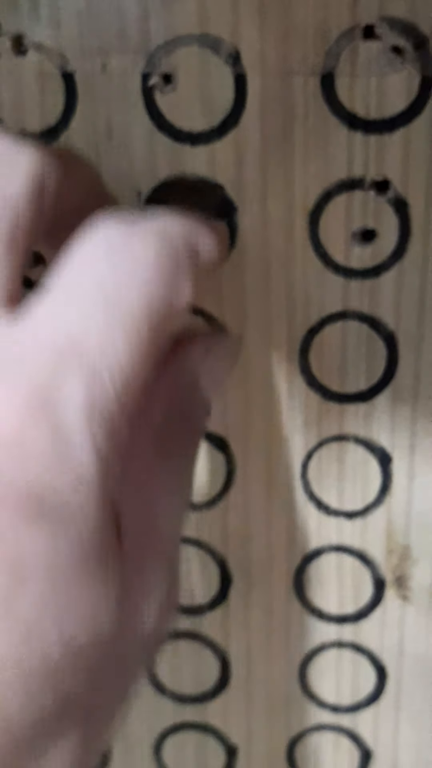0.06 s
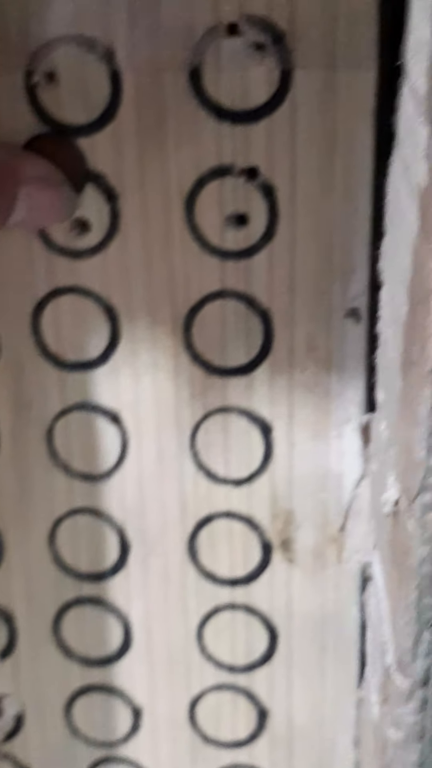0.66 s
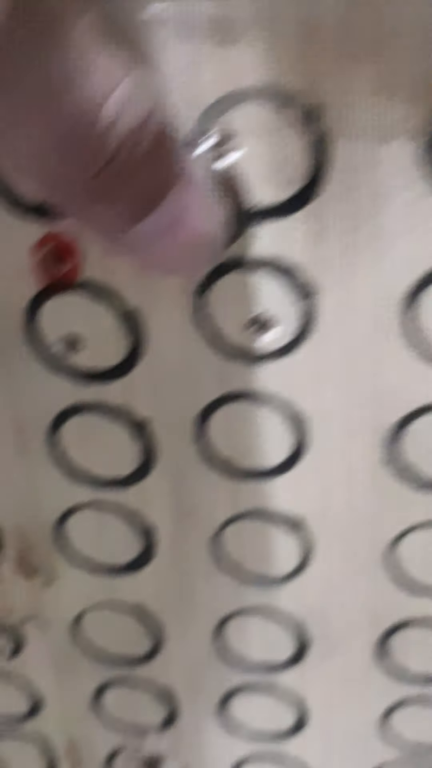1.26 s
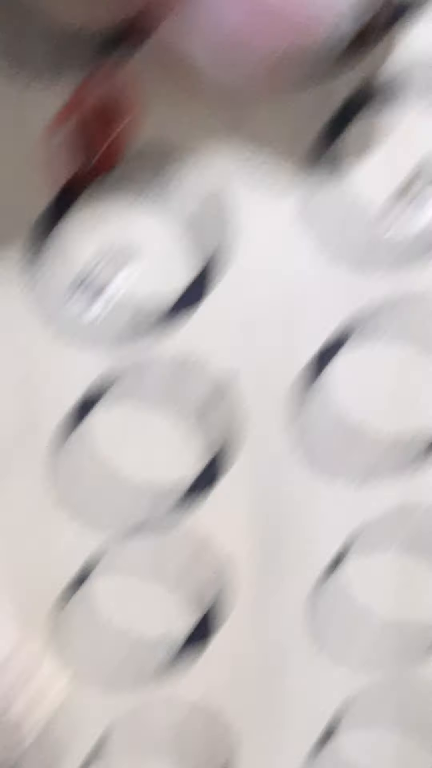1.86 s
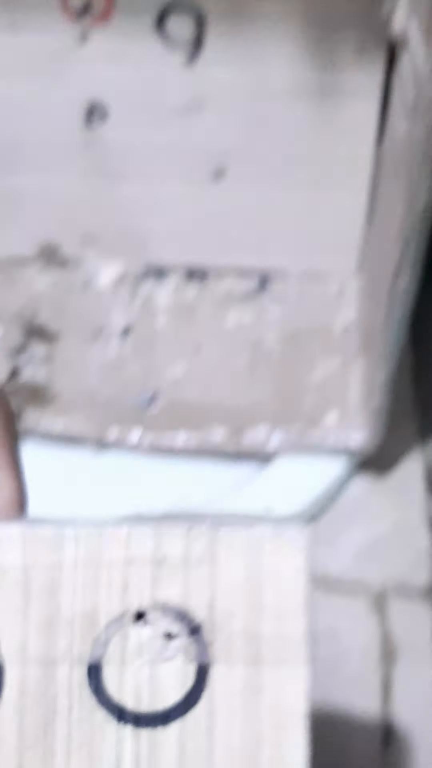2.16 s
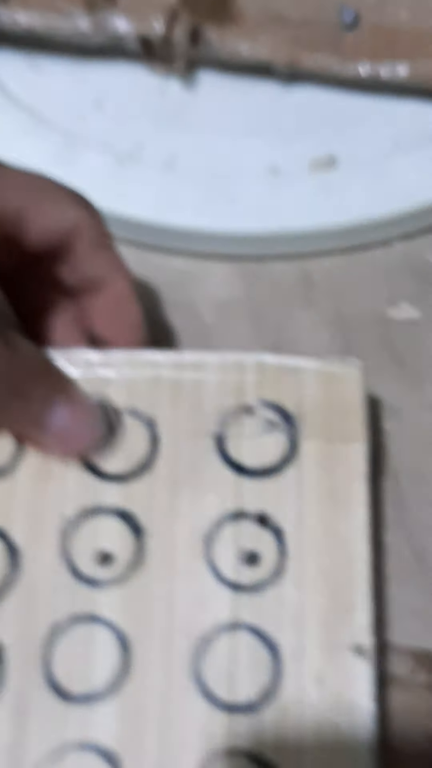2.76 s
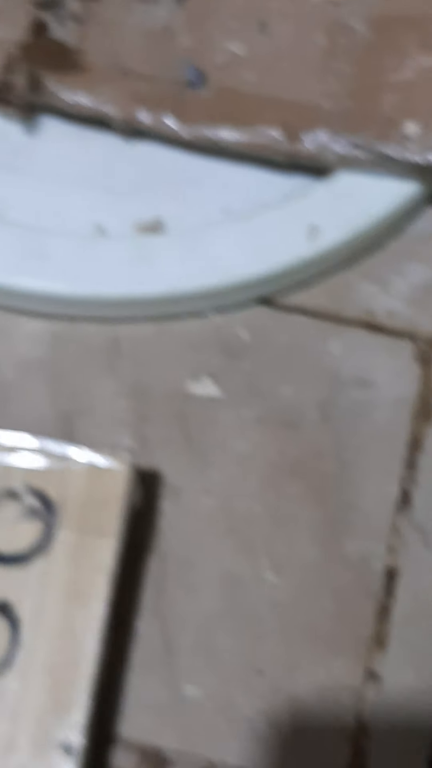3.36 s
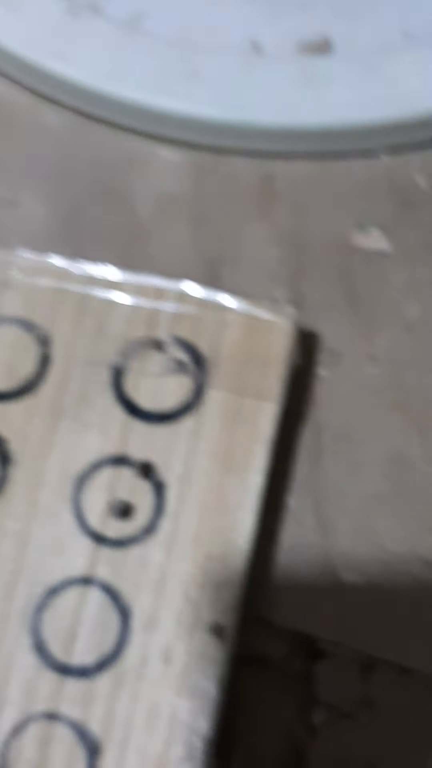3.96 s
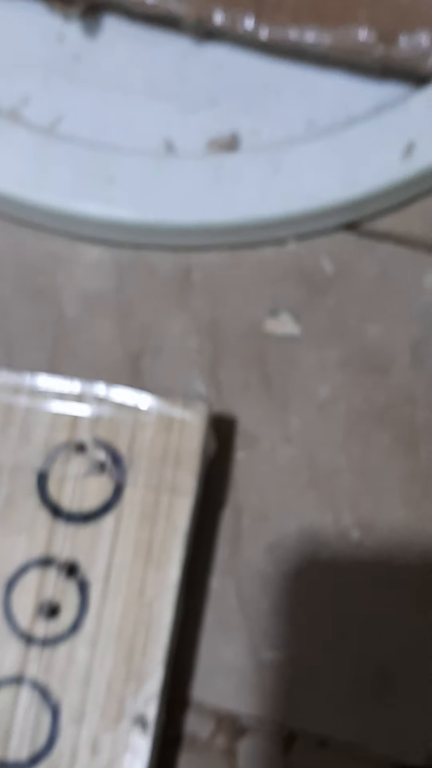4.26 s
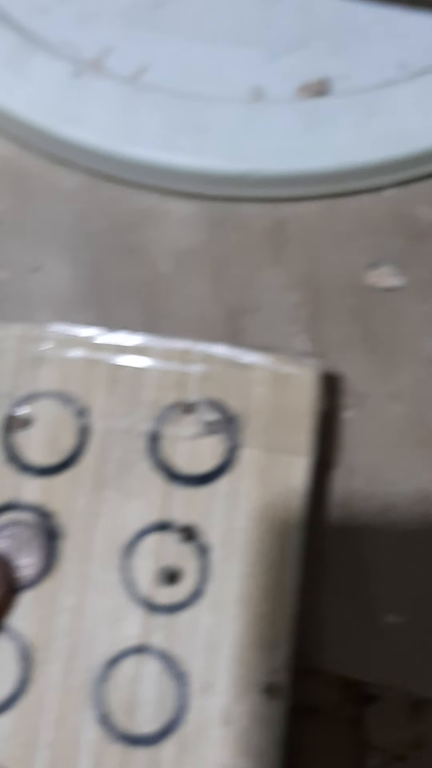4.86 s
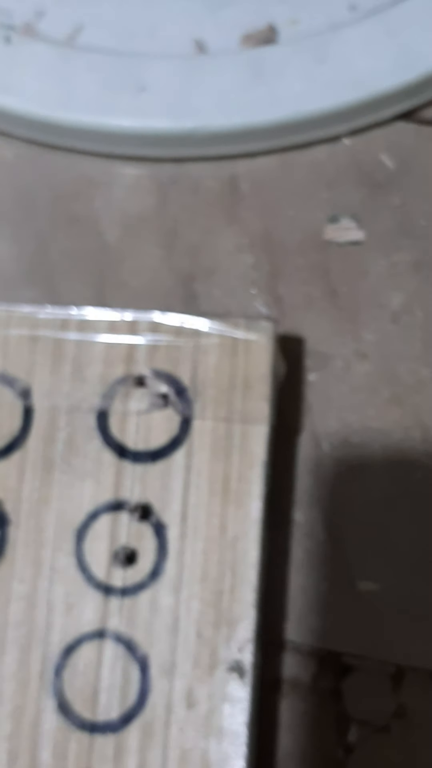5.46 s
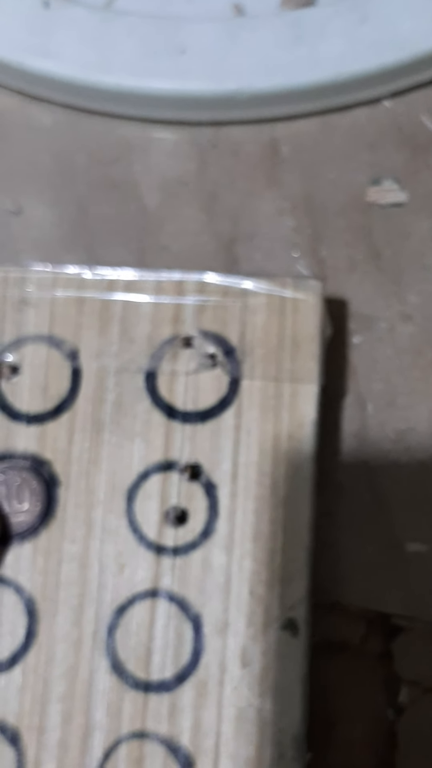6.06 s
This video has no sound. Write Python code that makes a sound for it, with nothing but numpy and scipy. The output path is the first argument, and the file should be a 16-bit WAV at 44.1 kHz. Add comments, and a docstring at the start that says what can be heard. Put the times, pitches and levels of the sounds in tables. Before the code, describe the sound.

A disc slides and taps on a wooden board, which clatters onto a hard floor, then a coin clicks on it over faint hum.

```python
"""A room with a hard floor, the microphone close to a wooden game board, a fan humming behind.
A disc slides over the board, hissing, catching and tapping on the grain. The board knocks, chatters
down onto the floor and rings in its modes; then a coin clicks on it. The holding hand covers the right
port, which hears mostly its rumble. The loud clatter ducks the gain control for about a second."""
import sys
import numpy as np
from scipy import signal
from scipy.fft import rfft, irfft, next_fast_len
from scipy.io import wavfile
from scipy.ndimage import uniform_filter1d, minimum_filter1d

SR = 44100
rng = np.random.default_rng(int(sys.argv[2]) if len(sys.argv) > 2 else 0)


def inscribe(sig):
    """Save sig as 16-bit PCM at rate SR to the path in sys.argv[1].

    A 1-D sig is mono; a 2-D sig holds one channel per row.
    Samples are clipped to [-1, 1] before scaling.
    """
    pcm = np.round(np.clip(np.atleast_2d(sig).T, -1, 1) * 32767)
    wavfile.write(sys.argv[1], SR, pcm.astype(np.int16))


N = 269098

# hiss of light sliding on wood: (frequency [Hz], relative level [dB])
FRICTION_SPECTRUM = [(1500, -1), (3500, -10), (6500, 3.5), (8200, -10), (11500, -4), (16000, -9)]
# crack of a blow on the held board: (frequency [Hz], relative level [dB])
WOOD_CRACK_SPECTRUM = [(150, -8.5), (700, -10), (1200, 6), (1500, -10), (3700, -5), (4700, -16.5),
                       (6300, -12), (8200, -31.5), (16000, -43.5)]


def from_db(db):
    """Decibels to gain."""
    return 10 ** (np.asarray(db) / 20)


def rms_one(x):
    """Scale to unit power."""
    return x / np.sqrt(np.mean(x ** 2) + 1e-20)


def colour(x, spectrum):
    """Shape a noise by a table of (frequency [Hz], level [dB]), rolling off beyond its ends."""
    hz, db = np.transpose(spectrum)
    size = next_fast_len(len(x))
    bins = np.maximum(np.arange(size // 2 + 1) * SR / size, 1)
    rolloff = np.minimum(bins / hz[0], 1) ** 2 * np.minimum(hz[-1] / bins, 1) ** 2
    gain = from_db(np.interp(np.log(bins), np.log(hz), db))
    return irfft(rfft(x, size) * rolloff * gain, size)[:len(x)]


def noise(spectrum):
    """Smooth coloured noise, rms 1."""
    return rms_one(colour(rng.standard_normal(N), spectrum))


def grains(spectrum, per_s, spread_db):
    """Random micro-slips of uneven size, rms 1."""
    sizes = from_db(spread_db * np.minimum(rng.exponential(1, N), 4)) * rng.choice([-1, 1], N)
    slips = sizes * (rng.random(N) < per_s / SR)
    return rms_one(colour(slips, spectrum))


def clicks(times, db):
    """One impulse of the given level at each time."""
    out = np.zeros(N)
    out[np.round(times * SR).astype(int)] = from_db(db)
    return out


def ring(force, hz, t60):
    """A damped mode: a unit impulse sets a sine of height 1 ringing."""
    r, w = from_db(-60 / (t60 * SR)), 2 * np.pi * hz / SR
    return signal.lfilter([0, np.sin(w)], [1, -2 * r * np.cos(w), r * r], force + 1e-18)


def fade(power, t60):
    """Amplitude envelope of energy that dies away after each input."""
    decay = np.exp(-np.log(10 ** 6) / (t60 * SR))
    return np.sqrt(signal.lfilter([1], [1, -decay], power + 1e-18))


def struck(hits, modes, crack, crack_db, crack_t60, tail_db, tail_t60, contact_s=.00013):
    """Each contact rings the main modes, plus a crack and a short wash of dense, weak modes."""
    times, hit_db, hardness = np.transpose(hits)
    body = 0
    for hz, db, t60 in modes:
        # a hard contact favours the high modes; each spot struck has a mix of its own
        mode_db = hit_db + db + hardness * np.log2(hz / 1000) + rng.standard_normal(len(times))
        mode = ring(clicks(times, mode_db), hz, t60)
        body += signal.lfilter(*signal.iirpeak(hz, 1, fs=SR), mode)  # builds up in about one cycle
    # little is radiated below the lowest mode
    body = signal.sosfilt(signal.butter(2, .7 * modes[0][0], "high", fs=SR, output="sos"), body)
    body = signal.sosfilt(signal.butter(8, 7400, fs=SR, output="sos"), body)
    power = clicks(times, hit_db + hardness) ** 2
    wash = from_db(crack_db) * fade(power, crack_t60) + from_db(tail_db) * fade(power, tail_t60)
    smoothing = np.exp(-1 / (contact_s * SR))
    return body + noise(crack) * signal.lfilter([1 - smoothing], [1, -smoothing], wash)


def fan(waver=.06, air_db=-51):
    """The room tone: a fan's motor hum wavers slightly over its rushing air."""
    # motor hum: (frequency [Hz], rms level [dB])
    hum_lines = [(120, -42.5), (284, -67), (354.5, -65), (641, -74), (707, -76.5)]
    # rush of air: (frequency [Hz], relative level [dB])
    air_spectrum = [(30, -7.5), (65, 13), (100, 13), (160, 0), (280, 3), (460, -1), (750, 3), (1300, 1.5),
                    (2400, -1), (3800, -1), (6800, -6.5), (8100, -22), (16000, -27.5)]
    t = np.arange(N) / SR
    hum = sum(np.sqrt(2) * from_db(db) * np.sin(2 * np.pi * (hz * t + rng.random()))
              for hz, db in hum_lines)
    drift = noise([(1, 0), (4, -6)])
    return hum * (1 + waver * drift) + from_db(air_db) * noise(air_spectrum)


def hand(grip_db=-45.5, relax_db_per_s=1.4, squeeze_db=9, squeeze_at_s=4.987, squeeze_width_s=.17):
    """Handling noise: skin creeps on the case, relaxing, then squeezing once; shifting fingers bump."""
    # rumble through the case: (frequency [Hz], relative level [dB])
    rumble_spectrum = [(22, -9), (45, 9.5), (70, 10.5), (120, 3.5), (200, -5), (350, -25.5), (700, -48.5),
                       (1500, -61.5)]
    # soft finger bumps: (time [s], relative level [dB])
    finger_bumps = [(0.673, -22), (1.658, -27.5), (2.833, -19.5), (3.383, -25), (3.5436, -5),
                    (5.005, -24.5)]
    t = np.arange(N) / SR
    squeeze = np.exp(-((t - squeeze_at_s) / squeeze_width_s) ** 2)
    level = from_db(grip_db - relax_db_per_s * t + squeeze_db * squeeze)
    bumps = ring(clicks(*np.transpose(finger_bumps)), hz=105, t60=.027)
    dull_bumps = signal.sosfilt(signal.butter(2, [50, 260], "band", fs=SR, output="sos"), bumps)
    return level * grains(rumble_spectrum, per_s=550, spread_db=1.5) + dull_bumps


def stroke(start, length, attack_s=.024, release_s=.018):
    """Envelope of a stroke that takes hold, slides evenly and dies away."""
    age = np.arange(N) / SR - start
    return np.clip(age / attack_s, 0, 1) * np.exp(-np.maximum(age - length, 0) / release_s)


def rubbing(splinters_per_s=50, splinter_db=4, splinter_spread_db=5):
    """Light contact hisses and catches on splinters; pressure digs in and makes the board sound."""
    # the disc, then fingers, on the wood: (start [s], length [s], friction [dB], scrape over it [dB])
    strokes = [(0.448, 0.52, -60, 9.5), (1.016, 0.11, -61.5, 5.5), (1.119, 0.24, -53.5, 4),
               (1.391, 0.14, -44.5, 2.5), (1.538, 0.091, -48.5, 7), (2.402, 0.51, -56.5, 5.5),
               (2.975, 0.1, -50, 3), (3.38, 0.25, -55.5, 5.5), (3.762, 0.046, -54.5, -6)]
    # the board scraped under pressure: (frequency [Hz], relative level [dB])
    scrape_spectrum = [(150, 5), (330, 0), (480, -1.5), (800, 3), (1500, -6), (2200, 1), (2700, -7.5),
                       (3250, -4.5), (4500, -3.5), (6800, -9.5), (8200, -29.5)]
    friction, pressed = 0, 0
    for start, length, friction_db, pressure_db in strokes:
        level = from_db(friction_db) * stroke(start, length)
        friction += level
        pressed += from_db(pressure_db) * level
    hiss = grains(FRICTION_SPECTRUM, per_s=6000, spread_db=3.5)
    scrape = grains(scrape_spectrum, per_s=2000, spread_db=3.5)
    caught = rng.random(N) < splinters_per_s / SR
    sizes = from_db(splinter_db + splinter_spread_db * np.minimum(rng.exponential(1, N), 2))
    splinters = fade((caught * sizes) ** 2, t60=.0066) * noise(FRICTION_SPECTRUM)
    return friction * (hiss + splinters) + pressed * scrape


def snaps(build_db=-23, build_s=.0052, skid_db=-21, skid_s=.006):
    """The sliding edge catches, creaks up briefly, lets go in a sharp burst and skids on a moment."""
    # catches: (time [s], relative body level [dB], relative treble level [dB], time constant [s])
    catches = [(.5195, -39, -36, 0.00087), (.566, -18, -25, 0.00083), (.639, -42, -36.5, 0.0025),
               (.727, -40.5, -44, .0024), (.8395, -49, -34, 0.0051), (.925, -35, -37.5, .0028),
               (.966, -36.5, -62, .0011), (1.0233, -35, -49, 0.0014), (1.0476, -33, -36.5, 0.0025),
               (1.136, -30, -38, 0.0011), (1.158, -55, -32.5, 0.00054), (1.2779, -40.5, -30, .0007),
               (1.8804, -35, -62, 0.00073), (2.699, -35.5, -45, 0.005), (2.721, -50, -36.5, .0024),
               (2.774, -48, -33, 0.0027), (2.963, -33.5, -22, .0014), (3.092, -28, -27.5, 0.0025),
               (3.574, -49, -39, 0.0049)]
    # body of a snap: (frequency [Hz], relative level [dB])
    snap_spectrum = [(500, 10), (1500, 2), (2600, 3), (3500, 10.5), (7000, 3.5), (8300, -25)]
    small_snap_hz, big_above_db, db_per_octave = 5600, -32.5, 17  # bigger snaps sound lower
    t, out = np.arange(N) / SR, np.zeros(N)
    treble = noise(FRICTION_SPECTRUM)
    for time, body_db, treble_db, decay_s in catches:
        near = slice(int((time - .05) * SR), int((time + .05) * SR))
        age = t[near] - time
        creak = from_db(build_db) * np.exp(-abs(age) / build_s)
        burst = (age >= 0) * np.exp(-abs(age) / decay_s)
        skid = (age >= 0) * from_db(skid_db) * np.exp(-abs(age) / skid_s)
        hz = small_snap_hz * 2 ** (-max(body_db - big_above_db, 0) / db_per_octave)
        band = signal.lfilter(*signal.iirpeak(hz, 2, fs=SR), rng.standard_normal(len(age)))
        body = rms_one(colour(band, snap_spectrum))
        out[near] += (creak + burst) * from_db(body_db + 3) * body
        out[near] += (creak + burst + skid) * from_db(treble_db + 2) * treble[near]
    return out


def disc_taps():
    """The disc taps the board as it is pushed along."""
    # taps: (time [s], level [dB], hardness [dB/octave])
    taps = [(.6857, -19, 1), (.7168, -35.5, 8.5), (.7595, -32, -1.5), (.792, -33.5, -6),
            (1.589, -32.5, 4.5), (1.605, -29, -0.5), (1.825, -40, -2)]
    # modes rung by the disc: (frequency [Hz], level [dB], t60 [s])
    modes = [(212, -12, 0.1), (423, -7, 0.028), (814, -4.5, 0.038), (1028, -5, 0.037), (1110, -32.5, 0.032),
             (2060, -13, 0.055), (2220, -17, 0.033), (4200, -18.5, 0.025)]
    return struck(taps, modes, WOOD_CRACK_SPECTRUM,
                  crack_db=-8.5, crack_t60=.0192, tail_db=-19.5, tail_t60=.082)


def rim_song(rise_octaves_per_s=3.8):
    """The disc's rim sings in the grain: a broad resonance swells and rises as the disc speeds up."""
    # fast pushes: (start [s], length [s], starting frequency [Hz], level [dB])
    pushes = [(1.261, 0.13, 1980, -49), (1.391, 0.18, 2653, -41)]
    t, out = np.arange(N) / SR, 0
    half_bandwidth = signal.butter(2, 450, fs=SR, output="sos")
    wobble = rms_one(signal.sosfilt(half_bandwidth, rng.standard_normal((2, N))))
    for start, length, hz, db in pushes:
        age = np.clip(t - start, 0, length)
        phase = 2 * np.pi * np.cumsum(hz * 2 ** (rise_octaves_per_s * age)) / SR
        swell = from_db(db) * np.sin(np.pi * age / length) ** 2
        out += swell * (wobble[0] * np.cos(phase) + wobble[1] * np.sin(phase))
    return out


def board_knocks():
    """Knocks ring the board while it is still held."""
    # knocks: (time [s], level [dB], hardness [dB/octave])
    knocks = [(2.3243, -6.5, -0.5), (2.3500, -7, -2), (2.436, -30, 3.5)]
    # modes of the held board: (frequency [Hz], level [dB], t60 [s])
    modes = [(129.6, -21, 0.52), (209.3, -19.5, 0.12), (362, -23, 0.1), (606, -19, 0.02),
             (707, -0.5, 0.017), (974, -9.5, 0.05), (1140, -30, 0.0496), (1694, -14, 0.022),
             (1840, -18, 0.051), (3100, -38, 0.048), (3773, -19, 0.032), (5940, -20, 0.011)]
    return struck(knocks, modes, WOOD_CRACK_SPECTRUM,
                  crack_db=-16, crack_t60=.015, tail_db=-24.5, tail_t60=.18)


def board_chatter():
    """The board's edge chatters on the hard floor in a quick run of contacts."""
    # floor contacts: (time [s], level [dB], hardness [dB/octave])
    contacts = [(2.51744, 0, -1.5), (2.52497, -3, -1.5), (2.5334, -1, -2), (2.54404, -0.5, -0.5),
                (2.55367, -6.5, 3), (2.5756, -1, 4.5), (2.58032, -8.5, -6), (2.58522, -3, -1),
                (2.59966, -5, -4.5)]
    # modes of the board on the floor: (frequency [Hz], level [dB], t60 [s])
    modes = [(131.9, -28.5, 0.5), (193.7, -40, 0.13), (272, -31, 0.079), (579, -30.5, 0.095),
             (577, -39, 0.074), (792, -9.5, .07), (872, -11.5, .05), (945, -4.5, .065), (1044, -15, .05),
             (1140, -31, 0.0737), (1285, -27, 0.037), (1608, -26, 0.1), (2225, -17.5, 0.031),
             (2260, -25, 0.031), (2736, -24, 0.026)]
    # crack of wood on the floor: (frequency [Hz], relative level [dB])
    crack = [(150, 2.5), (450, -10), (720, 0.5), (950, 11.5), (1500, -11), (2400, -9.5), (3500, -15.5),
             (5000, -23), (6700, -21), (8200, -40), (16000, -39.5)]
    return struck(contacts, modes, crack, crack_db=-42, crack_t60=.02, tail_db=-12.5, tail_t60=.15)


def coin_clicks():
    """A coin clicks as it is set down on the board."""
    # taps: (time [s], level [dB], hardness [dB/octave])
    taps = [(3.025, -13.5, -15.5), (3.0772, -2, -2), (3.7265, -19, 6), (3.7722, -23, 7.5),
            (3.8025, -22, 2.5), (3.8235, -18.5, -5), (3.836, -26.5, -3.5), (5.13, -36, -6)]
    # modes rung by the coin: (frequency [Hz], level [dB], t60 [s])
    modes = [(773, -25, 0.12), (1002, -25, 0.15), (1150, -12, 0.037), (1932, -6, 0.023),
             (2040, -11.5, 0.062), (2300, -26, 0.027), (3680, -19, 0.063), (4080, -20, 0.017),
             (5400, -15, 0.0096), (6220, -17, 0.013)]
    # crack of metal on wood: (frequency [Hz], relative level [dB])
    crack = [(500, -48), (1000, -0.5), (2200, -5), (3000, -7), (4000, -4.5), (6600, -13.5), (8200, -35),
             (16000, -43)]
    return struck(taps, modes, crack, crack_db=-13, crack_t60=.016, tail_db=-18, tail_t60=.11)


def room(x, early_db=-15, early_t60=.15, late_db=-25, late_t60=.94):
    """Near surfaces answer after 4 ms; the hard-walled room rings on faintly."""
    # colour of the reverberation: (frequency [Hz], gain [dB])
    room_spectrum = [(100, -6), (300, 8.5), (550, 8.5), (950, 8), (1400, 3.5), (3000, 7), (7000, 2.5),
                     (16000, 7)]
    t, response = np.arange(SR) / SR, 0
    for db, t60 in ((early_db, early_t60), (late_db, late_t60)):
        tail = colour(rng.standard_normal(SR), room_spectrum) * from_db(-60 * t / t60) * (t > .004)
        energy_scale = np.sqrt(np.log(10 ** 6) / (t60 * SR))
        response += from_db(db) * tail * energy_scale
    return signal.fftconvolve(x, response)[:N]


def scene():
    """The open left port hears the board close up and the room; the covered right one, the hand."""
    impacts = disc_taps() + board_knocks() + board_chatter() + coin_clicks()
    board = impacts + rubbing() + rim_song() + snaps()
    airborne = board + room(board) + fan()
    handling = hand()
    # hiss at the covered port: (frequency [Hz], relative level [dB])
    hiss_spectrum = [(300, 7.5), (1000, 1), (4000, -2.5), (16000, -1.5)]
    left = airborne + from_db(-25.5) * handling
    right = from_db(-43.5) * airborne + handling + from_db(-74) * noise(hiss_spectrum)
    return np.array([left, right])


def gain_control(x, threshold_db=-17, slope=3.5, depth_db=16, hold_s=1.072, attack_s=.17, release_s=.33):
    """A sustained loud sound on the left pulls both channels down; the gain holds, then creeps back."""
    step = 64  # samples per gain update
    power = uniform_filter1d(x[0] ** 2, size=1323)[::step]  # 30 ms average
    level_db = 10 * np.log10(abs(power) + 1e-12)
    cut_db = np.clip(slope * (level_db - threshold_db), 0, depth_db)
    half_hold = int(hold_s * SR / step) // 2
    wanted = minimum_filter1d(from_db(-cut_db), 2 * half_hold + 1, origin=half_hold)
    gain = [1]
    for goal in wanted:
        lag_s = attack_s if goal < gain[-1] else release_s
        gain.append(gain[-1] + (goal - gain[-1]) * step / (lag_s * SR))
    return x * np.interp(np.arange(N) / step, np.arange(len(gain)), gain)


def record(dry):
    """The recorder rides the gain, clips at full scale and cuts the top above 16 kHz."""
    clipped = np.clip(gain_control(dry), -1, 1)
    return signal.sosfilt(signal.ellip(10, .1, 80, 16000, fs=SR, output="sos"), clipped)


dry = scene()
out = record(dry)
inscribe(out)
```